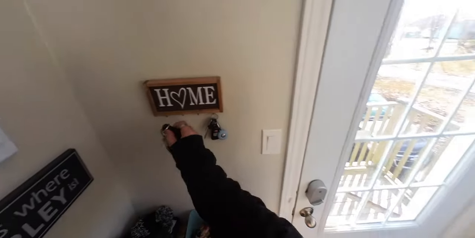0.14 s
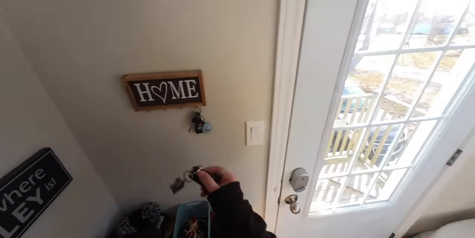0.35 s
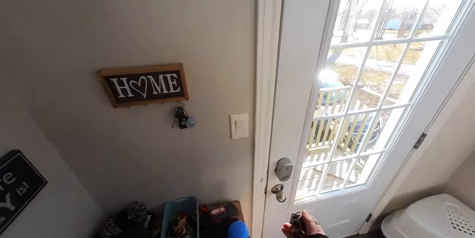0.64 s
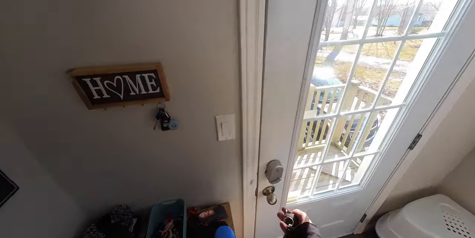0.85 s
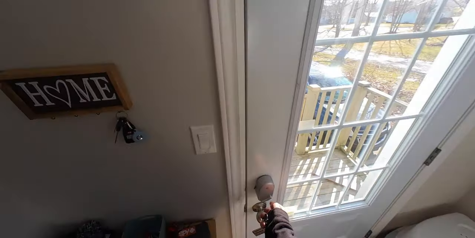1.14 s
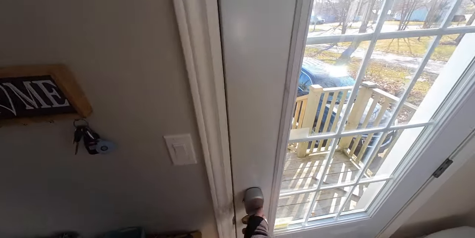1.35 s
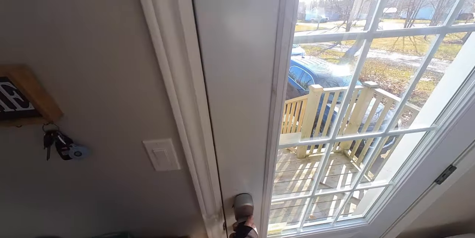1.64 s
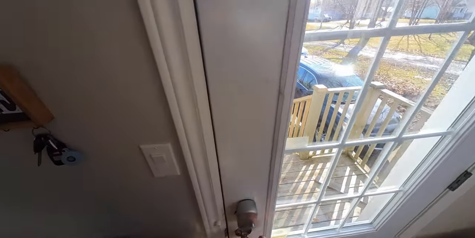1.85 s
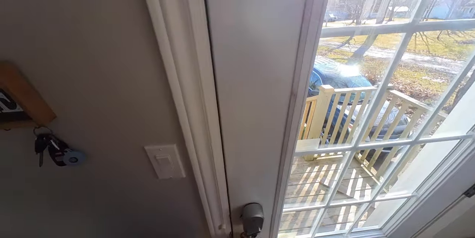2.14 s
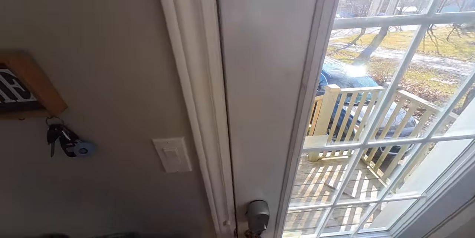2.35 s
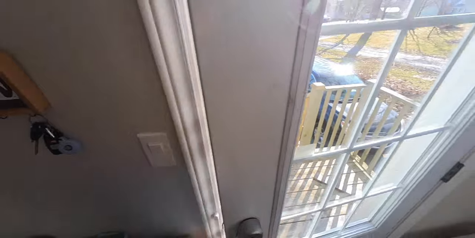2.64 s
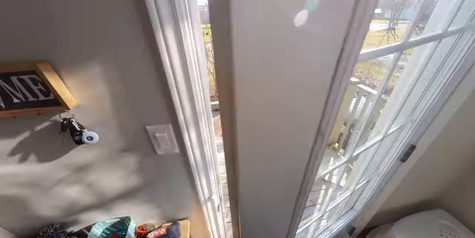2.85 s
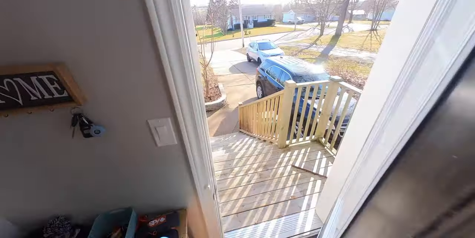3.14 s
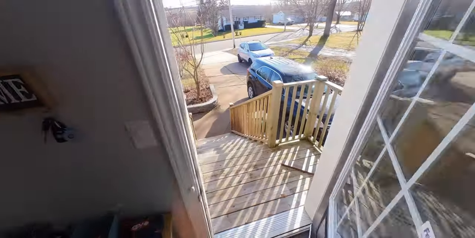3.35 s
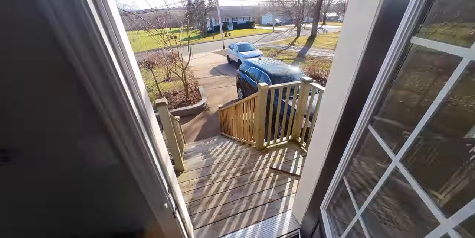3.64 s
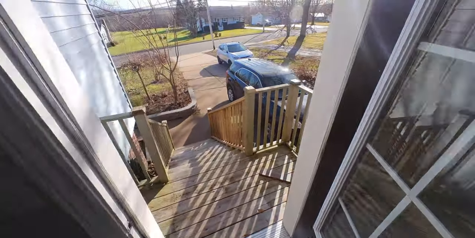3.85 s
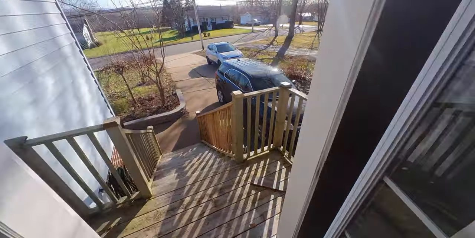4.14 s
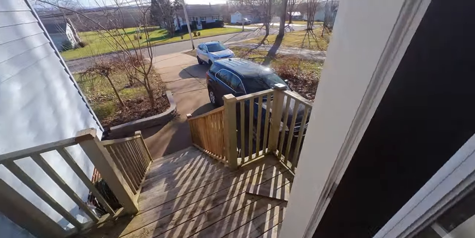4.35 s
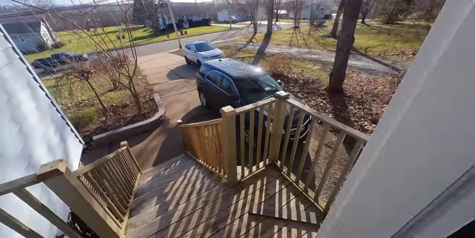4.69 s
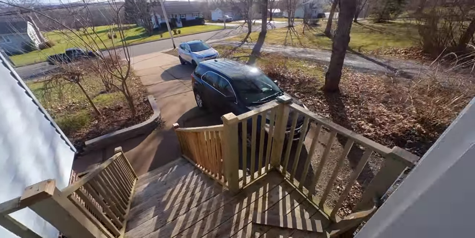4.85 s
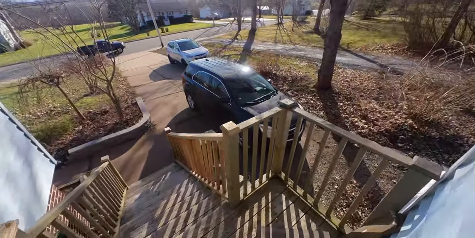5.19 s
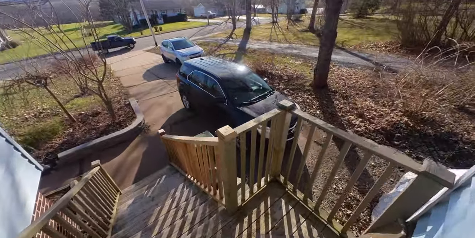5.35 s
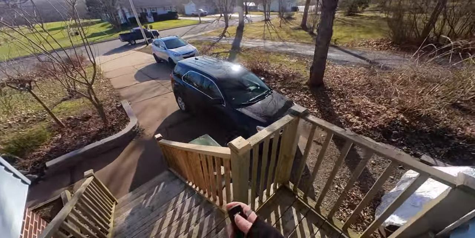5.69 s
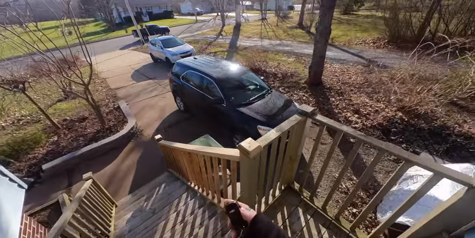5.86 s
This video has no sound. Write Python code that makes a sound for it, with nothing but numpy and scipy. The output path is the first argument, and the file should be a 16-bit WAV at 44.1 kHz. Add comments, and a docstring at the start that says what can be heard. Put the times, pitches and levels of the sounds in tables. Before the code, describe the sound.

Close to the wearer in a quiet entryway, a wooden hook board knocks against the wall and a bunch of keys jingles brightly. A latch clacks and a door seal tears loose with a dull drag and hiss. Faint footsteps follow onto a deck while a passing pickup's hum and tyre roar swell. The door bangs shut behind with a rattle, and the keys clink again.

```python
"""Keys are lifted off a wall hook and jangle in the hand; a door is unlatched, pulled off its seal and swung open.
Outside a pickup drives by, engine hum and tyre roar swelling; the door bangs shut and the keys ring once more.
Keys, door and fittings are ringing tones set going by short bursts; seal, tyres and air are coloured noise.
The engine is a stack of wavering sines."""
import sys
import numpy as np
from scipy import signal
from scipy.fft import rfft, irfft
from scipy.io import wavfile

SR = 44100
rng = np.random.default_rng(int(sys.argv[2]) if len(sys.argv) > 2 else 0)


def unload_audio(sound):
    """Save the sound as a 16-bit wav file, at the path given as the first command line argument."""
    columns = np.transpose(np.atleast_2d(sound))
    # keep every value between -1 and 1, then stretch to whole-number steps
    steps = np.round(np.clip(columns, -1, 1) * 32767)
    wavfile.write(sys.argv[1], SR, steps.astype(np.int16))


N = 265526   # length in samples

# bright colour of latch metal, also of the seal's hiss: [f/Hz, relative level per Hz/dB]
LATCH_COLOUR = [(2350, -59), (4000, 0), (4310, 3), (5590, -0.5), (6190, -2), (8500, -12.5), (9850, -15),
                (15500, -40)]


def amp(db):
    """Turn decibels into a gain."""
    return 10 ** (np.asarray(db) / 20)


def in_time(rows, quiet=None):
    """Read a curve's columns at every sample; outside it hold the end values, or quiet if given."""
    s, *columns = np.transpose(rows)
    return [np.interp(np.arange(N) / SR, s, column, quiet, quiet) for column in columns]


def drift(rate_hz):
    """Random wandering with a spread of about 1: noise smoothed twice, keeping what is slower than rate_hz."""
    step = 40   # samples between drawn points
    r = np.exp(-2 * np.pi * rate_hz * step / SR)
    noise = rng.standard_normal(N // step + 2002)
    slow = signal.lfilter([1], [1, -2 * r, r * r], noise)[2000:]   # drop the start-up
    return np.interp(np.arange(N) / step, np.arange(len(slow)), slow / slow.std())


def ring(push, hz, t60):
    """A resonance: a unit click sets off a sine of height 1 that falls 60 dB in t60 seconds (at least 0.01)."""
    r = amp(-60 / (max(t60, .01) * SR))
    w = 2 * np.pi * hz / SR
    return signal.lfilter([0, np.sin(w)], [1, -2 * r * np.cos(w), r * r], push + 1e-18)


def colour(x, spectrum):
    """Shape the spectrum with a causal (minimum-phase) filter; white noise keeps its average power."""
    hz, db = np.transpose(spectrum)
    grid = np.arange(4097) * SR / 8192 + 1   # the 1 keeps the logarithm finite
    gain = amp(np.interp(np.log(grid), np.log(hz), db))
    cepstrum = irfft(np.log(gain / np.sqrt(np.mean(gain ** 2))))
    cepstrum[1:4096] *= 2   # fold the spectrum's log so that nothing sounds early
    cepstrum[4097:] = 0
    impulse = irfft(np.exp(rfft(cepstrum)))
    return signal.oaconvolve(x, impulse)[:len(x)]


def bursts(s, db, t60, rise_s):
    """Envelope of blows that rise quickly and die away, 60 dB in t60 seconds (kept within 0.01 to 1)."""
    out, t = np.zeros(N + SR), np.arange(SR // 2) / SR
    decays = np.clip(np.broadcast_to(t60, len(s)), .01, 1)
    for start, level_db, decay in zip(s, db, decays):
        i = round(start * SR)
        out[i:i + len(t)] += amp(level_db - 60 * t / decay) * (1 - np.exp(-t / rise_s))
    return out[:N]


def filtered(x, order, hz, kind):
    """Cut off what lies outside the wanted range, with a Butterworth filter."""
    return signal.sosfilt(signal.butter(order, hz, kind, fs=SR, output="sos"), x)


def still_air():
    """The quiet background is steady noise, strongest in the lows."""
    air_colour = [(15, -54), (25, -12), (43, -18), (74, -0.5), (104, 0.5), (323, -6.5), (463, -7.5),
                  (718, -12.5), (1200, -15.5), (1520, -8.5), (1870, -14.5), (4380, -20), (12000, -35.5),
                  (15600, -80), (22000, -120)]   # [f/Hz, relative level per Hz/dB]
    air_level = [(0.0, -61.5), (6.02, -64)]   # [t/s, level/dB]
    return amp(in_time(air_level)[0]) * colour(rng.standard_normal(N), air_colour)


def patches(x, patchy_db):
    """Half-octave bands swell and fade each on their own, as air and obstacles pass."""
    edges_hz = 140 * 2 ** np.arange(0, 6.6, .5)
    lows = [filtered(x, 2, hz, "low") for hz in edges_hz] + [x]
    out = lows[0]
    for lower, upper in zip(lows, lows[1:]):
        out = out + (upper - lower) * amp(patchy_db * drift(2.4))
    return out


def engine():
    """Sines at multiples of the firing rate hum together, each wavering on its own in level and phase."""
    engine_run = [(2.7, 101, -70), (2.8, 101, -55), (2.91, 101, -50), (3.25, 101, -62.5),
                  (3.4, 98.2, -59.5), (3.59, 98, -44.5), (4.12, 95, -45), (4.48, 91.6, -41),
                  (4.81, 87.2, -36.5), (5.15, 87.3, -31.5), (5.54, 87.2, -31.5), (5.62, 87, -36.5),
                  (5.9, 80, -39.5), (6.02, 79, -36)]   # [t/s, firing rate f/Hz, hum level/dB]
    orders = [(1, 1.5), (1.5, -9), (2, -13), (3, -31), (3.5, -15.5), (4, -26), (5, -32.5)]   # strength of each multiple: [multiple of the firing rate, level/dB]
    firing_hz, hum_db = in_time(engine_run)
    turns = 2 * np.pi * np.cumsum(firing_hz) / SR
    hum = 0
    for multiple, db in orders:
        waver_db = .8 if multiple == 1 else 3.5
        level = amp(db + waver_db * drift(1.7))
        hum = hum + level * np.sin(multiple * turns + 0.84 * drift(4.1))
    return amp(hum_db) * hum


def tyres():
    """Rolling tyres are noise: a low roar and, when near, a sizzle and a dry rustle of thrown grit."""
    road = [(2.9, -80, -78), (3.2, -63, -86), (3.56, -57.5, -68.5), (3.71, -47, -65.5), (4.29, -47, -62.5),
            (4.6, -42, -58.5), (5.06, -41.5, -51.5), (5.2, -41.5, -48.5), (5.35, -34.5, -49),
            (5.65, -31, -42.5), (6.02, -37.5, -51)]   # [t/s, roar level/dB, treble level/dB]
    # colours of the three noises: [f/Hz, relative level per Hz/dB]
    roar, sizzle, grit = [(30, -49), (70, -20), (110, -0.5), (170, 2), (240, -6.5), (330, -2.5),
                          (480, -4.5), (580, -6.5), (750, -1.5), (900, -0.5), (1100, -9.5), (1450, -12.5),
                          (1900, -46), (5000, -85)], [(900, -33), (1300, -5), (1600, 0), (2200, -7.5), (2900, -16),
                                        (4000, -54), (8000, -79)], [(1800, -41), (2800, 1.5), (3600, 2), (5000, -8),
                                                        (6000, -14), (8000, -58), (12000, -88)]
    roar_db, treble_db = in_time(road)
    # the rustle swells once, around 5.25 s, and sinks back
    swish_s, swish_width_s, swish_db = 5.25, 0.11, 5
    swish = np.exp(-((np.arange(N) / SR - swish_s) / swish_width_s) ** 2)
    grit_db = treble_db - 13 + swish_db * swish
    out = 0
    for level_db, spectrum in zip((roar_db, treble_db, grit_db), (roar, sizzle, grit)):
        out = out + amp(level_db + 1.11 * drift(3.9)) * colour(rng.standard_normal(N), spectrum)
    return patches(out, patchy_db=2.15)


def pickup():
    """The passing pickup is its engine's hum plus the noise of its tyres."""
    return engine() + tyres()


def seal():
    """Rubber tears loose from the frame in uneven slips, a dull drag and a bright hiss."""
    seal_drag = [(2.37, -44, -92), (2.386, -53, -39.5), (2.41, -32.5, -44.5), (2.5, -36, -53.5),
                 (2.524, -43.5, -52), (2.564, -19, -41), (2.594, -29, -48.5), (2.694, -46.5, -95),
                 (2.76, -96, -92.5)]   # the seal drags off the frame: [t/s, dull level/dB, treble level/dB]
    dull_colour = [(50, -39), (100, 0.5), (150, -12), (240, -2.5), (600, -12), (1000, -7.5), (1800, -11.5),
                   (3000, -18.5), (5000, -45), (9000, -48)]   # [f/Hz, relative level per Hz/dB]
    dull_db, treble_db = in_time(seal_drag, quiet=-120)
    slips = amp(2.3 * drift(95)) * rng.standard_normal((2, N))
    drag = colour(amp(dull_db - 2) * slips[0], dull_colour)
    hiss = colour(amp(treble_db - 1) * slips[1], LATCH_COLOUR)
    return drag + hiss


def thuds(s, db, modes):
    """One soft push sets the low modes going, each with a strength of its own."""
    out = 0
    for hz, level_db, t60 in modes:
        uneven_db = rng.normal(0, 1.5, len(s))
        push = bursts(s, db + level_db + uneven_db, 0.012, 0.00078)
        out = out + ring(push * (1 + 1.41 * drift(330)), hz, t60)
    return filtered(out, 2, 60, "high")   # free panels shed no steady pressure


def soft_thuds(modes):
    """Soft thuds, footsteps and at 5.789 s the door's rebound, ring in the door's low modes."""
    thud_rows = [(1.014, -34), (1.118, -36), (2.428, -25), (2.477, -39), (2.619, -30), (3.501, -31),
                 (3.589, -25), (4.66, -21.5), (5.789, -1.5)]   # [t/s, relative level/dB]
    s, thud_db = np.transpose(thud_rows)
    return thuds(s, thud_db - 48, modes)


def knocks(blows, modes):
    """A snap, a crack and a duller tail in the wood, strongest where the struck spot rings; fittings clack; a thud."""
    wood_colour = [(150, -32.5), (240, 5.5), (350, 1.5), (650, -2.5), (1000, -2), (1600, -1.5), (2200, -11),
                   (3200, -28), (7000, -72)]   # [f/Hz, relative level per Hz/dB]
    fittings = [(1858, -3, 0.028), (2074, 0, 0.02), (2310, -3.5, 0.059), (2514, -2.5, 0.037),
                (2740, -1, 0.021), (3030, 0, 0.015), (3310, -3.5, 0.024), (3630, -3.5, 0.023),
                (4120, -11, 0.037)]   # tones of lock and hinges: [f/Hz, level/dB, 60 dB decay/s]
    # for each thing struck, against the blow: [clack of the fittings level/dB, sharp latch level/dB]
    struck_levels = {"wood": (-25, -35), "frame": (-18, -24), "lock": (-7, -28), "latch": (-7.5, -7),
                     "jamb": (-11.5, -16.5)}
    s, what, peak_db, thud_db, spot_hz, t60 = map(np.array, zip(*blows))
    clack_db, sharp_db = peak_db + np.transpose([struck_levels[name] for name in what])
    loose = amp(2.04 * drift(170))   # loose parts keep touching
    rattle = loose * rng.standard_normal(N)

    snap = bursts(s, peak_db - 8, 0.01, 0.00032)
    crack = bursts(s, peak_db - 13, 0.32 * t60, 0.0024)
    tail = bursts(s, peak_db - 18.5, 1.44 * t60, 0.015)
    wood = colour((snap + crack + tail) * rattle, wood_colour)
    spots = 0
    for start, db, hz, decay in zip(s, peak_db, spot_hz, t60):
        push = bursts([start], [db - 26], 0.4 * decay, 0.00045)
        spots = spots + ring(push * rattle, hz, 26.4 / hz)

    shake = bursts(s, clack_db - 24.5, 0.25 * t60, 0.00016) + bursts(s, clack_db - 37, 1.22 * t60, 0.005)
    clack = 0
    for hz, db, decay in fittings:
        clack = clack + amp(db) * ring(loose * shake * rng.standard_normal(N), hz, decay)
    clack = filtered(clack, 2, [1500, 5000], "band")

    metal = bursts(s, sharp_db - 2, 0.17 * t60, 0.0022) + bursts(s, sharp_db - 7, 0.73 * t60, 0.0069)
    latch = colour(metal * rattle, LATCH_COLOUR)
    return wood + spots + thuds(s, thud_db - 36, modes) + clack + latch


def board_knocks():
    """The hook board knocks on the wall and rings in its own low modes."""
    # [t/s, what is struck, peak level/dB, thud level/dB, loudest f/Hz, decay/s]; levels and decays relative
    board_blows = [(0.002, "frame", -23.5, -41.5, 1274, 0.44), (0.035, "frame", -9.5, -24, 1550, 0.18),
                   (0.047, "lock", -23, -25.5, 860, 0.17), (0.107, "lock", -39, -32, 1090, 0.1),
                   (0.157, "wood", -39, -59, 1560, 0.067)]
    board_modes = [(102.6, 0.5, 0.17), (172, -1, 0.1), (288, 6, 0.15), (356.6, 8, 0.18)]   # [f/Hz, level/dB, 60 dB decay/s]
    return knocks(board_blows, board_modes)


def door_knocks(modes):
    """Blows on latch, door and frame, the bang as it shuts among them, ring in the door's low modes."""
    # [t/s, what is struck, peak level/dB, thud level/dB, loudest f/Hz, decay/s]; levels and decays relative
    door_blows = [(2.058, "frame", -19, -46.5, 1180, 0.32), (2.121, "frame", -37.5, -48, 1260, 0.19),
                  (2.197, "latch", -35, -47.5, 1700, 0.2), (2.295, "wood", -29.5, -37, 1270, 0.29),
                  (2.332, "frame", -36, -39, 746, 0.17), (2.383, "latch", -30, -42, 1090, 0.18),
                  (2.4, "lock", -23.5, -30.5, 1030, 0.12), (2.488, "lock", -36, -32.5, 686, 0.19),
                  (2.518, "latch", -37, -49, 520, 0.59), (2.543, "lock", -19, -27.5, 551, 0.29),
                  (2.563, "lock", -14, -53, 1175, 0.19), (2.584, "jamb", -28, -32.5, 1100, 0.18),
                  (2.86, "wood", -36, -51.5, 715, 0.17), (2.907, "latch", -36.5, -59, 1033, 0.11),
                  (2.94, "wood", -40, -64, 1260, 0.19), (3.069, "lock", -47.5, -61, 1800, 0.24),
                  (3.538, "wood", -41.5, -46, 900, 0.17), (4.025, "frame", -38.5, -49, 1020, 0.17),
                  (4.082, "wood", -27.5, -47.5, 650, 0.26), (4.098, "lock", -24.5, -51, 1930, 0.16),
                  (4.411, "frame", -37, -43, 1370, 0.22), (4.548, "frame", -28.5, -35.5, 1570, 0.12),
                  (5.293, "wood", -26, -35, 550, 0.14), (5.475, "latch", -35, -52, 864, 0.2),
                  (5.486, "latch", -32, -51, 830, 0.29), (5.656, "jamb", -11.5, -23, 1355, 0.17),
                  (5.695, "jamb", 3.5, -14.5, 1205, 0.11), (5.709, "latch", -29, -8.5, 1010, 0.16),
                  (5.733, "jamb", -25.5, -8.5, 610, 0.5), (5.764, "latch", -11, -25, 1630, 0.07),
                  (5.769, "frame", 0.5, -13.5, 1620, 0.076), (5.836, "latch", -25, -22.5, 1680, 0.15),
                  (5.847, "frame", -21, -22, 670, 0.075)]
    return knocks(door_blows, modes)


def pushes():
    """A touch in the bunch hits some parts, each next one softer, and only shakes the rest: times, ticks, pushes."""
    # [t/s, relative tick level/dB, relative push level/dB, parts struck from hardest to softest]
    jangle = [(0.138, -65, -55, "long car fob short"), (0.1922, -79, -51, "long car door thin"),
              (0.2099, -56, -43, "door long car ring"), (0.2182, -44.5, -42.5, "door long car ring"),
              (0.236, -81, -52, "door long thin car"), (0.259, -84, -56, "ring thin door"),
              (0.2885, -68, -59, "ring car"), (0.361, -74, -53, "door car"),
              (0.4328, -71, -49.5, "door car thin long"), (0.4908, -64, -41.5, "door car thin long ring"),
              (0.5057, -70, -51, "thin car door long"), (0.546, -66, -42.5, "door car short long"),
              (0.593, -85, -66, "car short"), (0.6202, -54, -38.5, "car long thin door short fob"),
              (0.6543, -48, -39, "ring long door fob thin"),
              (0.7259, -45, -34, "long short car fob door thin"), (0.7467, -49, -57, "long short car ring"),
              (0.7844, -52, -41.5, "car ring short long door"), (0.902, -56, -56, "short fob ring door"),
              (0.9205, -48, -40.5, "fob short"), (0.9325, -46.5, -45, "fob ring car door short"),
              (0.9718, -56, -47, "fob"), (1.064, -87, -48, "short fob door"),
              (1.0965, -48.5, -45, "door thin short fob"), (1.1512, -52, -43.5, "long door car"),
              (1.1649, -49.5, -47, "door fob car"), (2.003, -61, -56, "door short"),
              (2.027, -69, -50, "long"), (5.0203, -78, -59, "door"), (5.13, -88, -65, "door"),
              (5.5852, -64, -44.5, "door short fob car"), (5.6015, -56, -52, "fob short"),
              (5.8445, -47, -37.5, "short fob"), (5.882, -59, -47.5, "short car fob"),
              (5.9782, -69, -51, "fob"), (6.0007, -55, -51, "fob")]
    part_names = ["fob", "long", "ring", "short", "door", "car", "thin"]   # the fob, the split ring and five keys: [name]
    response_db = [1.5, -1, 0.9, .1, -0.3, .1, -3.5]   # how readily each part answers a direct hit: [level/dB]
    shaken_db = [-34, -39, -28, -21, -30, -18, -29]   # parts not struck, against the push: [level/dB]
    next_part_db = -4   # each further part is struck this much softer
    s, tick_db, push_db, struck = zip(*jangle)
    under_db = []
    for part, hit_db, shake_db in zip(part_names, response_db, shaken_db):
        row = []
        for names in struck:
            order = names.split()
            row.append(hit_db + next_part_db * order.index(part) if part in order else shake_db)
        under_db.append(row)
    return np.array(s), np.array(tick_db), np.array(push_db) + under_db


def keys():
    """Each touch is a short uneven chatter into every part, plus a tick and a dying rustle of small contacts."""
    # what each part rings with, one list a part: [f/Hz, level/dB, 60 dB decay in the open hand/s]
    key_modes = [
        [(2108, -5, 0.045), (2486, 0, 0.035), (2915, -2, 0.066), (3130, -3.5, 0.078), (3370, 3.5, 0.027),
         (3920, -20, 0.065)],
        [(5370, 1, 0.089), (5160, -10.5, 0.043), (5280, -26, .06)],
        [(7160, 1, 0.13), (7330, -29, 0.052)],
        [(8050, -31, 0.028), (8290, -10, 0.13), (8520, 2, 0.048), (8900, -14, 0.047)],
        [(9850, -2, 0.19), (9940, -6, 0.13), (10000, -8, 0.042), (10600, -33, 0.052)],
        [(11530, -12, 0.043), (11750, -5, 0.053), (11760, 2.5, 0.085), (12280, -10, 0.24)],
        [(15080, 14, 0.12), (14600, -27, 0.16)],
    ]
    contact_colour = [(2060, -35), (3500, -10.5), (4090, -13.5), (8700, 2), (9260, -1), (15700, -14)]   # small contacts: [f/Hz, relative level per Hz/dB]
    gripped_s, grip = .89, 0.83   # the fist closes (s) and shortens every ring by this factor
    s, tick_db, parts = pushes()
    held = np.arange(N) / SR > gripped_s
    brush_t60 = 0.19 * np.where(s > gripped_s, grip, 1)
    out = 0
    for part_db, modes in zip(parts, key_modes):
        push = bursts(s, part_db - 16.5, 0.021, 0.0011) + bursts(s, part_db - 32.5, brush_t60, 0.0093)
        push = push * amp(2.1 * drift(145))   # the parts rattle against each other
        rings = 0
        for hz, db, t60 in modes:
            chatter = amp(db) * push * rng.standard_normal(N)
            rings = rings + ring(chatter * ~held, hz, t60) + ring(chatter * held, hz, grip * t60)
        span_hz = [0.87 * min(modes)[0], 1.01 * max(modes)[0]]
        rings = filtered(rings, 2, span_hz, "band")   # a part is quiet away from its modes
        out = out + rings * amp(4.05 * drift(22))   # swinging and brushing make the ring waver
    ticks = bursts(s, tick_db + 6, 0.011, 0.00018)
    rustle = bursts(s, tick_db - 1.5, 0.17, 0.0064)
    return out + colour((ticks + rustle) * rng.standard_normal(N), contact_colour)


def scene():
    """All sources add up at one microphone."""
    door_modes = [(68.5, -4, 0.27), (98, 1.5, 0.25), (151, 2, 0.14), (194.3, -1, 0.17), (227, 0, 0.14),
                  (259, -3.5, 0.096), (343.4, 0.5, 0.098)]   # low tones of the door: [f/Hz, level/dB, 60 dB decay/s]
    background = still_air() + pickup()
    door = soft_thuds(door_modes) + seal() + door_knocks(door_modes)
    return (background + door + board_knocks() + keys())[None]


def record(dry):
    """Deep bass is cut, peaks are rounded, the top is cut."""
    x = filtered(dry, 4, 45, "high")
    x = 0.78 * np.tanh(x / 0.94)
    top_hz = 15900   # from here up the filter takes off at least 70 dB
    return signal.sosfilt(signal.cheby2(14, 70, top_hz, fs=SR, output="sos"), x)


dry = scene()
out = record(dry)
unload_audio(out)
```